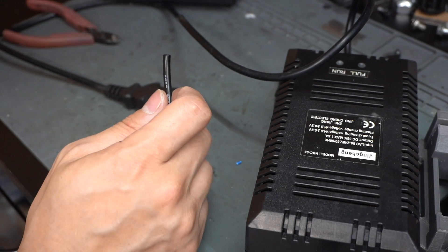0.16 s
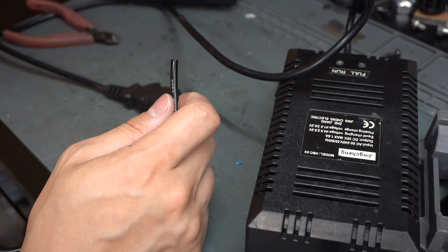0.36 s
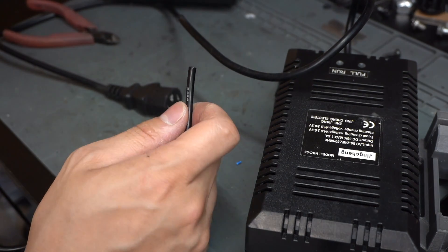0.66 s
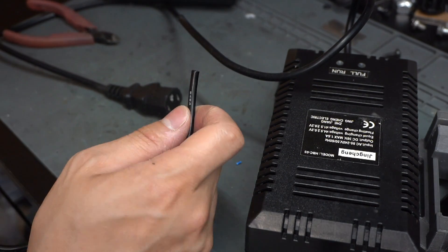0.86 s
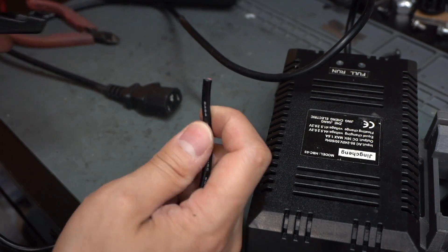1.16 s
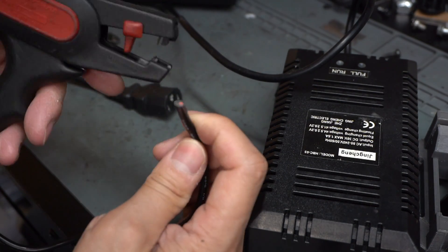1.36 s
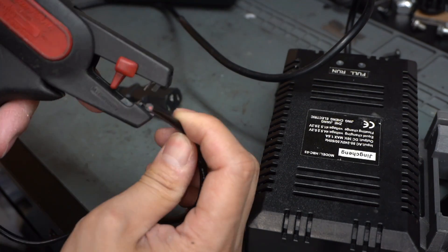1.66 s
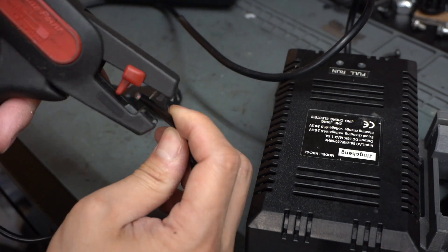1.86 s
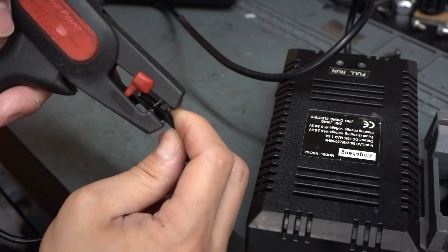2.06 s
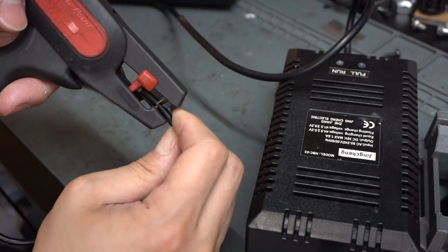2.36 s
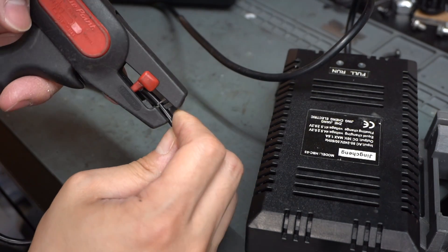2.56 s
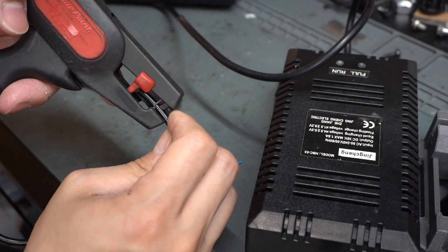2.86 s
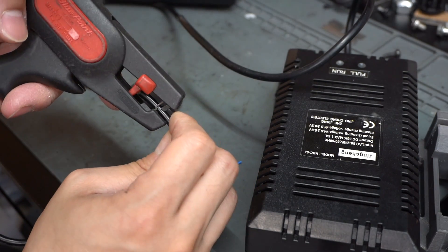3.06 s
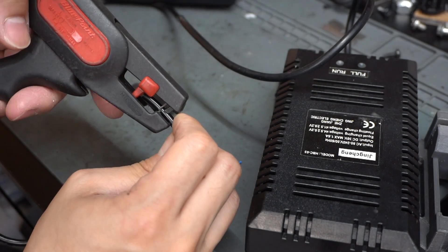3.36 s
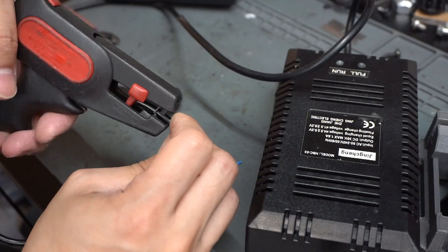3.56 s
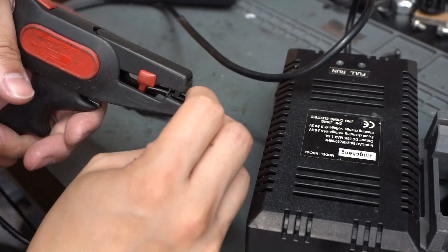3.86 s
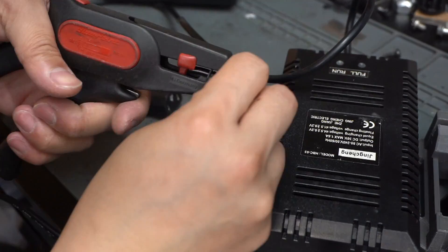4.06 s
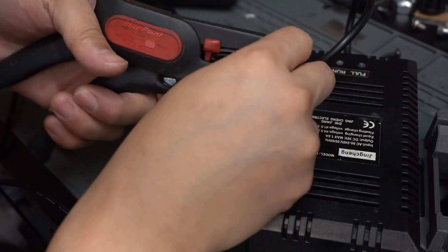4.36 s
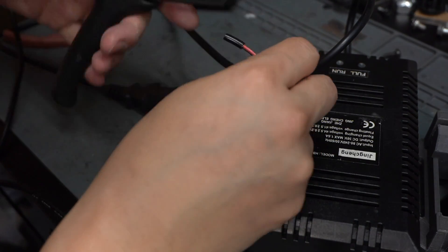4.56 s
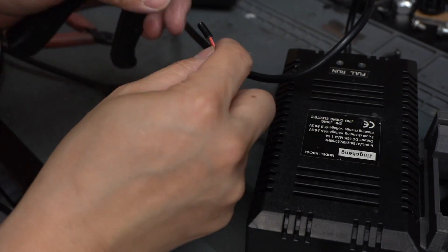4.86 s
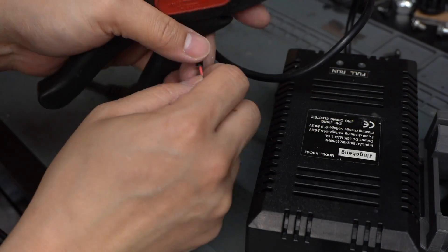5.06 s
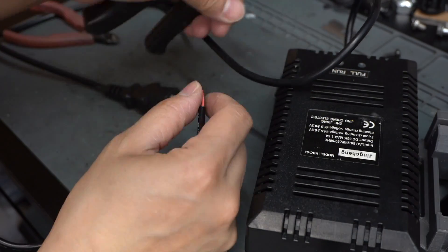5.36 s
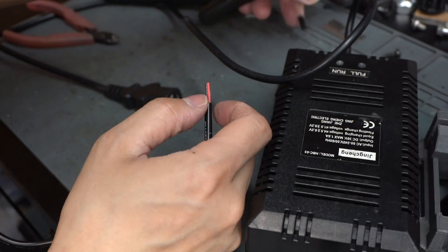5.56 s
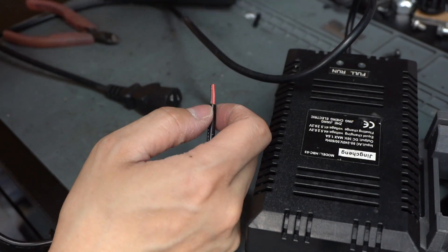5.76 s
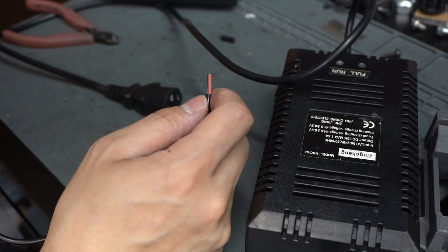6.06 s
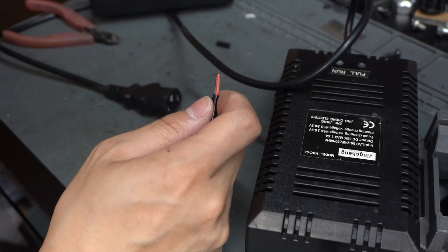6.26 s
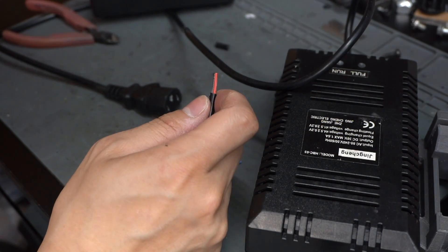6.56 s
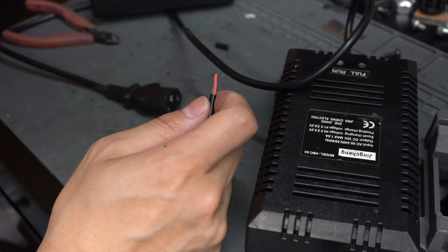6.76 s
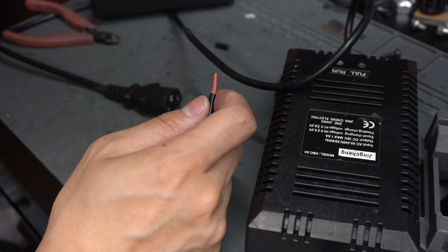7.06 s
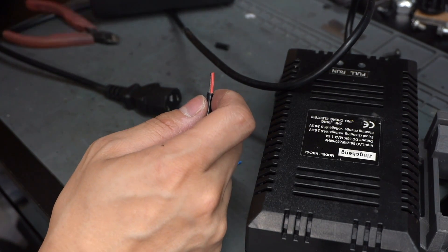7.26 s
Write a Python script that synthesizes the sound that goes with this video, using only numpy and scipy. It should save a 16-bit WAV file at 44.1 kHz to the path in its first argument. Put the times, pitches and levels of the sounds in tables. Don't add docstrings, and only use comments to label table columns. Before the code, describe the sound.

At a workbench, soft hand rubs lead to a short gritty scrape and thud as a heavy box is set down. Quiet cable handling follows, then a wire stripper bites with a hard snap and quick second clicks. Light ticks and rustles continue until the tool knocks down hard and bounces with rattles. Close microphone on the bench, small room, faint fan hum and hiss.

```python
import sys
import numpy as np
from scipy import signal
from scipy.fft import rfft, irfft
from scipy.io import wavfile
from scipy.ndimage import uniform_filter1d

SR = 44100
rng = np.random.default_rng(int(sys.argv[2]) if len(sys.argv) > 2 else 0)


def dump_mix(stems):
    frames = np.atleast_2d(stems).T
    limited = np.clip(frames, -1, 1)
    pcm = np.round(limited * 32767).astype(np.int16)
    wavfile.write(sys.argv[1], SR, pcm)


def nominal_scale(level):
    x = np.asarray(level, float) / 20
    return 10 ** x


N = 326781
T = np.arange(N) / SR


def unit(x):
    return x / np.sqrt(np.mean(x ** 2))


def band(x, lo_hz, hi_hz):
    sos = signal.butter(3, [lo_hz, min(hi_hz, .45 * SR)], "band", fs=SR, output="sos")
    return signal.sosfilt(sos, x)


def ring(x, hz, width_hz):
    return signal.lfilter(*signal.iirpeak(hz, hz / max(width_hz, 5.), fs=SR), x)


def body(x, modes):
    return x + sum(nominal_scale(db) * ring(x, hz, width_hz) for hz, width_hz, db in modes)


def ringing_noise(hz, width_hz):
    return unit(ring(ring(rng.standard_normal(N), hz, width_hz), hz, width_hz))


def walk(rate_hz):
    hold = int(SR / rate_hz)
    return uniform_filter1d(np.repeat(rng.standard_normal(N // hold + 1), hold), hold)[:N]


def soften(x, hz):
    return signal.lfilter(*signal.butter(1, hz, fs=SR), x)


def contact(events, bright_db, t60_s, ring_db):
    low, mid, high = np.zeros((3, N + 4096))
    t = np.arange(4096) / SR
    fade = np.minimum(t / (0.022 * t60_s), 1) * nominal_scale(-60 * t / np.clip(t60_s, .003, .2))
    for start_s, peak_db, ring_hz, low_db in events:
        push = rng.standard_normal(len(t)) * fade
        push[4] += nominal_scale(9.5)
        push = push + nominal_scale(ring_db) * ring(push, ring_hz, ring_hz / 3.5)
        start = int(start_s * SR)
        at = slice(start, start + len(t))
        bands = (low, 480, 1900, low_db), (mid, 1900, 7000, 0), (high, 7000, 15000, bright_db)
        for train, lo_hz, hi_hz, rel_db in bands:
            part = band(push, lo_hz, hi_hz)
            train[at] += nominal_scale(peak_db + rel_db) * part / np.abs(part).max()
    return (nominal_scale(1.0) * low + nominal_scale(-6.0) * mid + nominal_scale(2.5) * soften(high, 10000))[:N]


# start_s, peak_db, ring_hz, low_db
JAW_SNAPS = [
    (4.2521, 3, 5570, -15),
    (4.4309, -20, 2100, -24.5),
    (4.4921, -2.5, 2380, -19),
]


def snaps():
    return contact(JAW_SNAPS, bright_db=-5.5, t60_s=0.016, ring_db=1.6)


# start_s, peak_db, ring_hz, low_db
TOOL_BLOWS = [
    (6.3188, 3.5, 3130, -10.5),
    (6.9208, -15, 654, 1),
]


def blows():
    return contact(TOOL_BLOWS, bright_db=-11, t60_s=0.013, ring_db=3.9)


# start_s, peak_db, ring_hz, low_db
PART_RATTLES = [(.1743, -42.5, 5130, -17), (.2976, -28.5, 4350, -9), (.449, -20.5, 2200, -17.5),
                (4.2597, -5.5, 2950, -20), (5.3981, -20.5, 1100, -2), (5.4715, -18, 1900, -17),
                (5.5059, -21, 1040, -5.5), (5.663, -50.5, 650, 15), (6.1364, -31.5, 2170, -7),
                (6.327, -10.5, 1210, -9), (7.3989, -42, 748, -6.5)]


def rattles():
    return contact(PART_RATTLES, bright_db=-13, t60_s=0.049, ring_db=21)


# start_s, peak_db, ring_hz, low_db
SPRING_CLINKS = [(2.0169, -47, 3040, -5.5), (2.7974, -51, 1580, -9), (3.0135, -46.5, 1360, -9),
                 (3.7394, -55, 2170, 2), (4.4156, -28, 2930, -21), (4.4642, -19.5, 5900, -33),
                 (4.4661, -14, 2770, -23), (4.4952, -6, 4560, -39), (5.7574, -53, 670, 11),
                 (5.825, -39.5, 1470, -4.5), (6.1513, -26, 3150, -15), (6.1994, -34.5, 1090, 2),
                 (6.4235, -35.5, 1100, 9), (6.822, -30, 1590, -3.5)]


def clinks():
    return contact(SPRING_CLINKS, bright_db=-8.5, t60_s=0.033, ring_db=7.1)


# start_s, peak_db, ring_hz, low_db
PLASTIC_TICKS = [(.854, -17, 1540, -15), (.93, -25, 4000, -16), (1.3069, -35.5, 2940, -4),
                 (1.8744, -43.5, 3070, -2.5), (2.1096, -34.5, 2810, -6), (2.363, -42, 2056, -7.5),
                 (3.4029, -41, 2020, -11.5), (3.9659, -16.5, 3700, -13.5), (4.8464, -33.5, 1400, -22),
                 (4.8883, -28.5, 1350, -11), (4.9336, -32, 1190, 4), (5.204, -17, 4600, -14.5),
                 (5.4425, -37.5, 3120, 8), (5.4474, -29.5, 1040, -0.5), (5.5538, -33.5, 5600, -18),
                 (5.7926, -15, 5340, -38), (5.9314, -42.5, 960, 2.5), (6.2387, -22.5, 810, -8),
                 (6.6202, -26.5, 4200, -20), (6.6813, -19, 5430, -17), (6.7185, -26.5, 1940, -19),
                 (6.8323, -39.5, 1540, 2), (7.1669, -17, 3000, -4)]


def ticks():
    return contact(PLASTIC_TICKS, bright_db=-15.5, t60_s=0.023, ring_db=12)


# start_s, peak_db, ring_hz, low_db
JACKET_TAPS = [(.0535, -33, 4700, -2), (.2545, -28, 4240, -10), (.272, -41, 3500, -8),
               (.4415, -41, 1500, -4), (.536, -34, 2500, -7), (1.2559, -50.5, 1870, 1),
               (1.376, -53, 1500, -7), (1.8256, -53.5, 2470, -5), (2.0496, -49, 2470, -12),
               (2.0835, -47, 1970, -8), (2.338, -59, 2000, -6), (2.3834, -47, 2020, -5),
               (2.7775, -56, 3020, -6), (3.7799, -21.5, 3100, -11.5), (3.993, -32, 1500, -17),
               (4.065, -41, 3000, -15), (4.0745, -26, 2220, -9.5), (4.1723, -28.5, 1980, -10.5),
               (4.5535, -15.5, 2890, -17), (4.571, -35.5, 910, -5), (5.1895, -30, 3230, -14),
               (5.197, -24.5, 3140, -25.5), (5.9028, -39, 2600, 3), (6.4653, -25, 2260, -34.5),
               (7.094, -42, 1370, 4), (.511, -30.5, 1470, -12), (4.0243, -35.5, 2150, -13),
               (5.2693, -35.5, 2000, -11.5), (5.377, -48, 1210, 0), (6.5859, -34.5, 2040, -11.5),
               (6.0456, -28, 3000, -10.5), (6.2892, -19, 1210, -4), (6.296, -17, 2500, -6),
               (6.305, -20.5, 3000, -15)]


def taps():
    return contact(JACKET_TAPS, bright_db=-29, t60_s=.02, ring_db=16)


# start_s, peak_db, ring_hz, low_db
WIRE_SPARKS = [(.523, -40, 11000, -30), (4.018, -48, 11000, -25), (4.165, -55.5, 9450, -27),
               (4.401, -48, 12000, -26), (3.8331, -45, 10000, -30), (5.0, -49.5, 9000, -20),
               (5.3558, -50, 11000, -22), (5.524, -48, 12000, -16), (6.15, -47, 9000, -18),
               (6.2203, -43, 11000, -17), (6.293, -50, 10000, -25), (6.822, -54, 10000, -14),
               (6.9876, -35, 9000, -20), (6.9492, -27.5, 9500, -20), (6.96, -35, 10000, -11)]


def sparks():
    return contact(WIRE_SPARKS, bright_db=2.8, t60_s=0.011, ring_db=3.7)


# start_s, peak_db, ring_hz, low_db
TOOL_BOUNCES = [(4.4685, -18, 4000, -17.5), (4.475, -25, 2900, -13), (4.4985, -9, 4100, -31),
                (6.928, -12, 3000, -1), (6.936, -18, 3300, -5), (6.947, -12.5, 1520, -2),
                (6.9525, -0.5, 2980, -10), (6.9615, -10.5, 1700, -9), (6.9655, -19, 3000, 3.5),
                (6.973, -19, 1610, -1.5), (7.0355, -26, 1125, 5), (7.05, -22, 1780, -1.5),
                (7.066, -31, 1500, -3), (7.179, -19.5, 1500, -1.5), (7.184, -13, 2630, -2.5),
                (7.193, -16, 3800, -12), (7.199, -20.5, 2800, -3), (7.203, -23.5, 1500, -6)]


def bounces():
    return contact(TOOL_BOUNCES, bright_db=-17.5, t60_s=0.016, ring_db=28)


# start_s, level_db, pitch_hz, t60_s
KNOCK_RINGS = [(.0085, -53.5, 1570, 0.11), (0.044, -44, 337, 0.99), (0.053, -51, 1830, 0.5),
               (.2555, -53, 4260, 0.16), (0.298, -52, 4320, 0.24), (0.576, -24, 400, 0.1),
               (0.704, -26, 1533, .1), (4.254, -32, 152, 0.03), (5.4, -38.5, 145, 0.13),
               (5.471, -37.5, 130, 0.28), (5.664, -39.5, 182, 0.057), (6.215, -33.5, 152, 0.048),
               (6.3202, -13.5, 759, 0.029), (6.323, -31, 130, 0.16), (6.343, -26, 238, 0.033),
               (6.9216, -7.5, 662, 0.022), (6.9415, -21, 653, 0.055), (7.037, -29, 200, 0.21),
               (7.168, -22, 474, 0.067), (7.169, -21, 211, 0.052), (7.186, -30, 410, 0.017),
               (3.7796, -28, 2250, 0.027), (4.4312, -30.5, 2070, 0.037), (4.4298, -42, 1490, .04),
               (4.4672, -31, 5900, 0.028), (4.4915, -24, 2200, .03), (4.4925, -25, 2900, 0.027),
               (7.167, -14.5, 1500, .028), (0.0538, -52, 6220, 0.032), (0.45, -35, 5920, .03),
               (0.701, -20, 1330, 0.066), (.708, -19, 100, .3), (.745, -24.5, 91, .4),
               (0.571, -33, 99.4, .3), (6.3192, -15.5, 2310, .03), (4.2525, -11.5, 2200, .02),
               (5.7936, -33.5, 2990, 0.023), (3.9657, -29, 2200, .025)]


def rings():
    out, sway_db = np.zeros(N), 0.87 * walk(60)
    for start_s, level_db, pitch_hz, t60_s in KNOCK_RINGS:
        on = (T > start_s) & (T < start_s + 2 * t60_s)
        t = T[on] - start_s
        phase = 2 * np.pi * pitch_hz * t
        pair = np.sin(phase) + 0.23 * np.sin(0.9 * phase)
        out[on] += nominal_scale(level_db - 60 * t / t60_s) * pair
    return out * nominal_scale(sway_db)


def strokes(table, land_s, lift_db_per_s, low_db, rasp_db, hiss_db, low_slope, hiss_slope):
    power = np.zeros((4, N))
    for start_s, length_s, first_db, last_db, bright_db in table:
        on = (T > start_s - land_s) & (T < start_s + length_s + .15)
        t = T[on] - start_s
        press_db = np.interp(t, [0, length_s], [first_db, last_db])
        press_db = press_db - lift_db_per_s * np.maximum(t - length_s, 0)
        tilt_db = np.array([[low_db - low_slope * bright_db], [0],
                            [rasp_db + bright_db], [hiss_db + hiss_slope * bright_db]])
        landing = np.clip(t / land_s + 1, 0, 1)
        power[:, on] += (nominal_scale(press_db + tilt_db) * landing) ** 2
    return np.sqrt(power)


def friction(gains, modes, bass_hz, rasp_hz, top_hz, grain_db, slips_hz, slip_db):
    sizes = np.minimum(rng.exponential(size=N), 5)
    grains = rng.standard_normal(N) * nominal_scale(grain_db * sizes + slip_db * walk(slips_hz))
    rung = soften(soften(body(grains, modes), top_hz), top_hz)
    edges_hz = bass_hz, 850, 2200, rasp_hz, 17000
    bands = zip(gains, edges_hz, edges_hz[1:])
    return sum(gain * unit(band(rung, lo_hz, hi_hz)) for gain, lo_hz, hi_hz in bands) * nominal_scale(-6.0)


# mode_hz, width_hz, level_db
BENCH_MODES = [(87, 40, 27), (200, 42, 12.5), (307, 110, 12.5), (600, 340, 2), (1540, 100, -3.5)]
# start_s, length_s, first_db, last_db, bright_db
BOX_DRAGS = [
    (.568, 0.049, -32.5, -36, 5.5),
    (.593, 0.011, -31.5, -30.5, 5),
    (.606, .018, -33.5, -38.5, 0),
    (.624, 0.064, -33.5, -37.5, -2),
    (.701, 0.015, -21.5, -13.5, -5),
    (.713, 0.029, -16.5, -20, 0),
    (.735, 0.023, -18, -22.5, -5),
    (.753, 0.066, -24, -26.5, -4.5),
    (.828, .14, -29, -39.5, -5),
    (.985, 0.12, -39.5, -59, -4.5),
]


def drags():
    gains = strokes(BOX_DRAGS, land_s=0.0037, lift_db_per_s=1495.5, low_db=3.0, rasp_db=-1.5,
                    hiss_db=-4.5, low_slope=0.065, hiss_slope=1.7)
    return friction(gains, BENCH_MODES, bass_hz=135, rasp_hz=5070, top_hz=5100,
                    grain_db=2.0, slips_hz=110, slip_db=3.0)


# mode_hz, width_hz, level_db
TOOL_MODES = [(660, 150, 2), (1600, 400, 2), (3000, 450, 3), (3900, 400, 2), (5900, 500, 0)]
# start_s, length_s, first_db, last_db, bright_db
TOOL_SCUFFS = [
    (6.92, 0.036, -16.5, -17.5, 1.5),
    (6.958, .017, -22, -27, 4),
    (6.976, 0.02, -29, -44, -3),
    (7.0, 0.023, -48, -51, -2),
    (7.035, 0.025, -24.5, -27, -1),
    (7.052, 0.022, -25, -53, -2.5),
    (7.082, 0.093, -44, -60, 0),
    (7.168, 0.025, -25, -25.5, 1),
    (7.185, 0.028, -27, -66, 2),
]


def scuffs():
    gains = strokes(TOOL_SCUFFS, land_s=0.0033, lift_db_per_s=1506, low_db=-2, rasp_db=-2.5,
                    hiss_db=-16.0, low_slope=0.27, hiss_slope=1.0)
    return nominal_scale(-3.5) * friction(gains, BENCH_MODES + TOOL_MODES, bass_hz=119, rasp_hz=4700, top_hz=4000,
                                grain_db=3.5, slips_hz=170, slip_db=3.0)


# start_s, length_s, first_db, last_db, bright_db
HAND_RUBS = [(0, 0.45, -58, -59.5, -4.5), (.262, 0.066, -49, -45, 3), (.342, 0.032, -55.5, -55.5, 11),
             (.405, 0.056, -46.5, -45.5, -1), (.455, 0.075, -53, -56, 7.5), (.51, 0.02, -53, -45, 4),
             (1.125, 0.084, -58, -62.5, -10), (1.32, 0.41, -59.5, -80, -4), (2.42, 0.23, -66.5, -68, -2),
             (4.1, 0.16, -60.5, -57.5, -2.5), (5.56, 0.282, -68.5, -52, -0.5), (5.8, 0.16, -59, -61.5, 0.5),
             (6.02, .11, -62.5, -59.5, 2.5), (6.14, 0.12, -46, -53.5, 3), (6.36, 0.16, -41, -62, 2),
             (6.83, 0.11, -61, -43, -3)]
# start_s, length_s, first_db, last_db, bright_db
SLEEVE_RUSTLES = [
    (4.7, 0.045, -60, -56, -5),
    (4.765, 0.063, -49, -44, -5),
    (4.845, 0.06, -47.5, -40.5, -10),
    (4.95, .045, -42.5, -53.5, -8),
    (5.062, 0.044, -48, -47.5, -12),
]


def rubs():
    hands = strokes(HAND_RUBS, land_s=0.027, lift_db_per_s=600.0, low_db=6, rasp_db=-2.0,
                    hiss_db=-10.0, low_slope=1.0, hiss_slope=0.98)
    sleeve = strokes(SLEEVE_RUSTLES, land_s=0.018, lift_db_per_s=804, low_db=-5, rasp_db=-2.5,
                     hiss_db=-12.5, low_slope=.1, hiss_slope=0.93)
    return friction(np.hypot(hands, sleeve), BENCH_MODES, bass_hz=130, rasp_hz=6700, top_hz=14800,
                    grain_db=3.5, slips_hz=190, slip_db=3.0)


# mode_hz, width_hz, level_db
JAW_MODES = [(1980, 200, 5), (3230, 780, 4), (4150, 370, 3.5), (5900, 700, 2.5), (12500, 3400, 7)]
# start_s, length_s, first_db, last_db, bright_db
JAW_SCRAPES = [(1.22, 0.1, -60, -61, 2), (1.47, 0.073, -60.5, -61.5, 3), (1.56, 0.19, -63.5, -68, -3.5),
               (3.42, 0.061, -62, -74.5, 7), (3.49, 0.15, -57, -58.5, 4.5), (3.65, 0.14, -60, -74, 2),
               (3.89, 0.068, -52.5, -58, 2), (4.275, 0.12, -39, -57, 16.5), (4.41, 0.062, -52, -54.5, 9.5),
               (4.58, 0.04, -66, -69, 9), (4.65, 0.0255, -63, -59, 10.5), (5.0, 0.029, -49.5, -46.5, 2),
               (5.13, 0.038, -63, -61, 1.5), (5.24, 0.14, -80, -67.5, 8.5), (6.22, 0.086, -46.5, -42, -0.5),
               (6.5, 0.17, -64, -62, 4), (6.69, 0.036, -46, -38, -1), (6.75, 0.066, -50, -55, 0.5)]
# start_s, length_s, first_db, last_db, bright_db
FINGER_BRUSHES = [(.28, 0.087, -65, -65, 9), (3.5, .06, -75, -74, 12), (3.9, .035, -67.5, -70, 13),
                  (3.58, 0.077, -69, -69, 11), (3.68, .03, -72, -76, 8), (5.0, .045, -66, -67, 6),
                  (5.14, 0.016, -69, -69, 8), (5.255, 0.036, -70, -72, 15.5), (6.27, 0.034, -63, -62, 4),
                  (6.72, 0.016, -69, -77, -4)]


def scrapes():
    jaws = strokes(JAW_SCRAPES, land_s=0.016, lift_db_per_s=897.5, low_db=-4.5, rasp_db=-3.5,
                   hiss_db=-12.5, low_slope=0.092, hiss_slope=0.79)
    fingers = strokes(FINGER_BRUSHES, land_s=0.012, lift_db_per_s=700, low_db=-5, rasp_db=-5.5,
                      hiss_db=2, low_slope=.1, hiss_slope=0.65)
    return friction(np.hypot(jaws, fingers), JAW_MODES, bass_hz=300, rasp_hz=6800, top_hz=14800,
                    grain_db=1.0, slips_hz=89, slip_db=1.5)


# start_s, deep_db, upper_db, t60_s
BENCH_JOLTS = [(0, -58, -51, 5.3), (.46, -66, -35.5, .3), (.59, -56.5, -35, 0.55), (.71, -26, -27.5, 0.98),
               (1.14, -40.5, -46, 0.41), (1.316, -29, -39.5, 2.5), (1.6, -40, -44, 1.5),
               (2.19, -51, -56.5, 1.9), (3.78, -38, -50, 0.7), (4.33, -44, -48, 1.3),
               (4.56, -45.5, -70.5, 0.88), (5.529, -27, -41, 1.2), (5.921, -44, -45.5, 1),
               (6.384, -22, -38, 1.9), (6.54, -23, -47.5, 0.27), (6.83, -30, -56, 0.26),
               (6.95, -42, -33.5, 1.3), (7.17, -48, -40, 0.77), (7.33, -36.5, -65, 0.78)]


def wobble():
    lean_db = np.array([[-56.5], [-57.5]])
    fade_ratio = np.array([[1], [1.4]])
    power = nominal_scale(lean_db) ** 2 + np.zeros(N)
    for start_s, deep_db, upper_db, t60_s in BENCH_JOLTS:
        t = T - start_s
        fade_db = np.where(t < 0, 500 * t, -60 * t / t60_s)
        power = power + nominal_scale(fade_db * fade_ratio + np.array([[deep_db], [upper_db]])) ** 2
    deep_hz = 26 * (1 + .15 * walk(9))
    deep = np.sin(2 * np.pi * np.cumsum(deep_hz) / SR) * nominal_scale(-3 + 2.5 * walk(12))
    upper_hz = 60 * (1 + 0.2 * walk(15))
    upper = np.sin(2 * np.pi * np.cumsum(upper_hz) / SR) * nominal_scale(3.0 + 4.6 * walk(12))
    rumble = nominal_scale(-57.0) * ringing_noise(49, 35)
    return np.sqrt(power[0]) * deep + np.sqrt(power[1]) * upper + rumble


# lo_hz, hi_hz, t60_s, level_db
ROOM_BANDS = [(99, 950, 0.15, -11), (965, 1880, 0.21, -12), (1900, 5500, 0.25, -14),
              (4800, 9000, .2, -12.5), (7950, 15500, 0.13, -12)]


def room(x):
    t = np.arange(SR // 2) / SR
    build_up = np.clip((t - .003) / 0.0032, 0, 1)
    tail = 0
    for lo_hz, hi_hz, t60_s, level_db in ROOM_BANDS:
        part = band(rng.standard_normal(len(t)), lo_hz, hi_hz) * nominal_scale(-60 * t / t60_s) * build_up
        tail = tail + nominal_scale(level_db) * part / np.sqrt(np.sum(part ** 2) * SR / 2 / (hi_hz - lo_hz))
    return signal.fftconvolve(x, tail)[:N]


# mode_hz, width_hz, level_db
HOUSING_MODES = [(1500, 170, 2.5), (2100, 500, -9.5), (3090, 880, 1), (4200, 490, 3), (5900, 810, 0.5),
                 (10330, 4400, 4.5)]


def housing(x):
    return body(x, HOUSING_MODES)


# freq_hz, level_db_per_hz
SHOP_SPECTRUM = [(50, -27.5), (85, 1.5), (168, -12), (234, -14.5), (333, -10.5), (397, -18), (616, -16.5),
                 (735, -23), (1450, -23), (2470, -32), (4090, -31), (8650, -35.5), (12300, -30.5),
                 (15300, -31.5), (16400, -47)]


def workshop():
    hz, db = np.transpose(SHOP_SPECTRUM)
    freq_hz = np.maximum(np.arange(N // 2 + 1) * SR / N, 1)
    shape = nominal_scale(np.interp(np.log(freq_hz), np.log(hz), db))
    hiss = unit(irfft(rfft(rng.standard_normal(N)) * shape, N))
    fan = nominal_scale(-8.5 + 1.9 * walk(14.0)) * ringing_noise(315, 72)
    return nominal_scale(-58) * (hiss * nominal_scale(1.0 * walk(5.0)) + fan)


def whine():
    return nominal_scale(-84.5) * unit(ring(rng.standard_normal(N), 13970, 150))


def scene():
    clicks = snaps() + blows() + rattles() + clinks() + ticks() + taps() + sparks() + bounces()
    near = clicks + rings() + drags() + scuffs() + rubs() + scrapes()
    return (housing(near + room(near)) + wobble() + workshop() + whine())[None]


def low_pass(x):
    return signal.sosfilt(signal.butter(12, 16530, fs=SR, output="sos"), x)


def record(dry):
    heard = signal.sosfilt(signal.ellip(8, .3, 32, 15850, fs=SR, output="sos"), dry)
    return low_pass(np.clip(heard, -.99, .99))


dry = scene()
out = record(dry)
dump_mix(out)
```